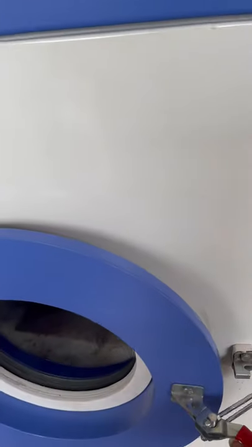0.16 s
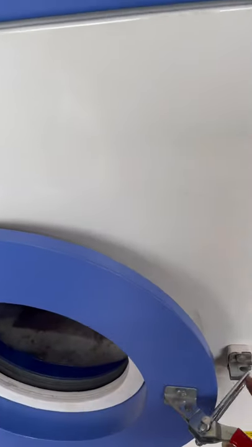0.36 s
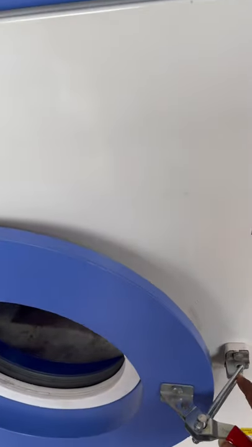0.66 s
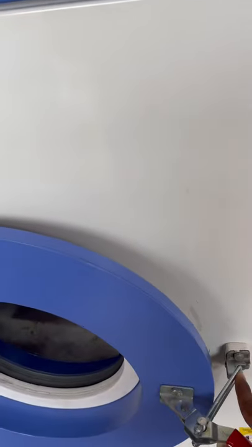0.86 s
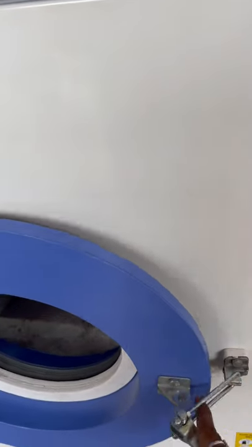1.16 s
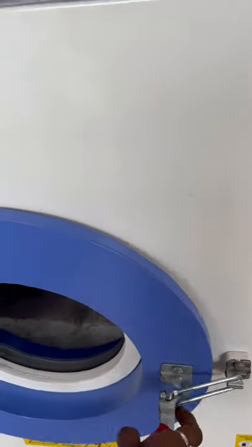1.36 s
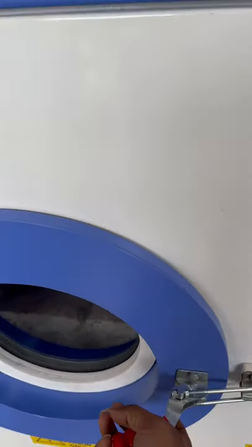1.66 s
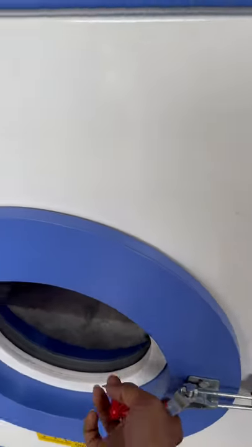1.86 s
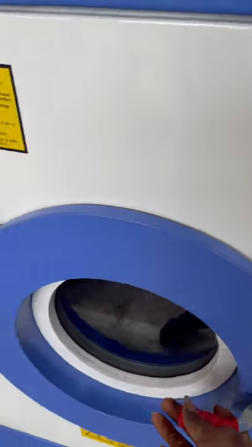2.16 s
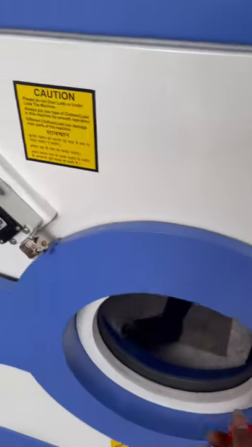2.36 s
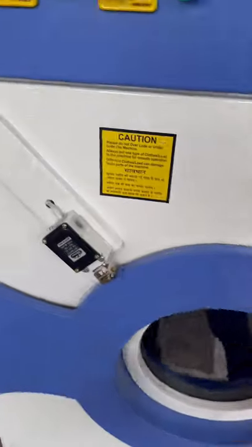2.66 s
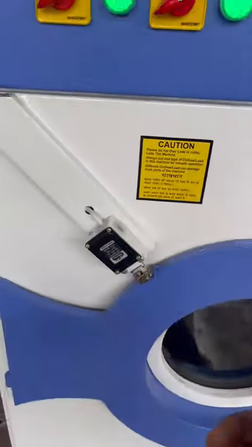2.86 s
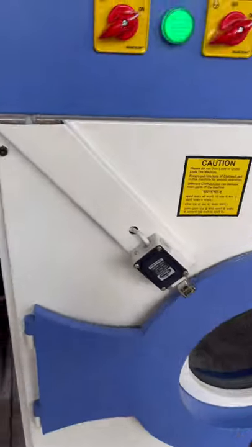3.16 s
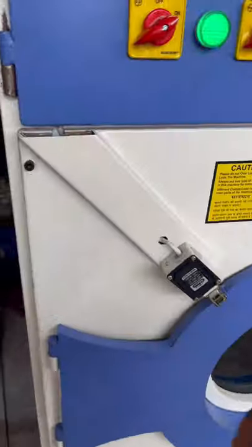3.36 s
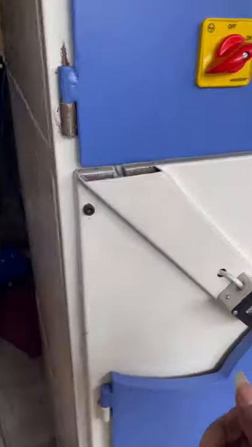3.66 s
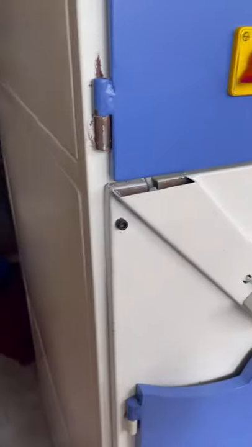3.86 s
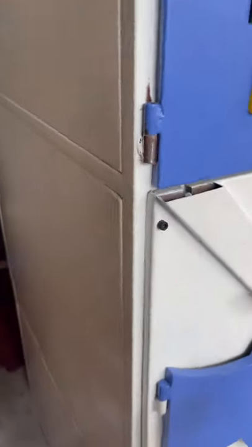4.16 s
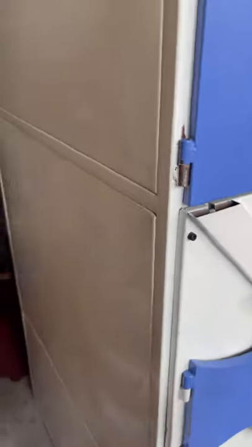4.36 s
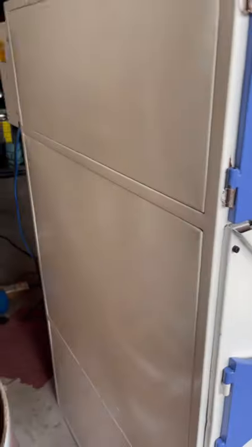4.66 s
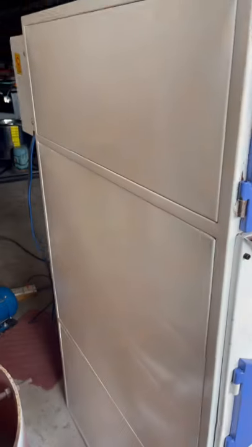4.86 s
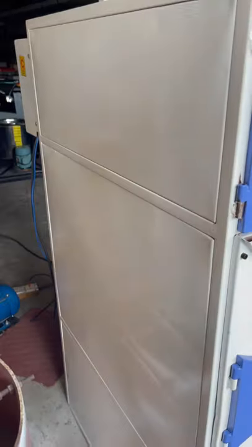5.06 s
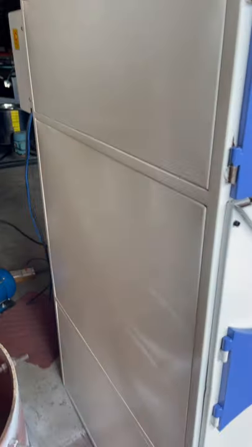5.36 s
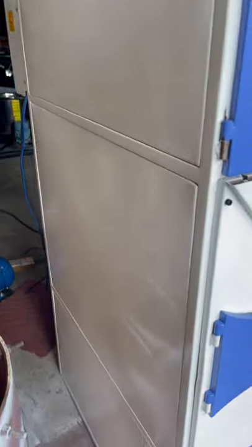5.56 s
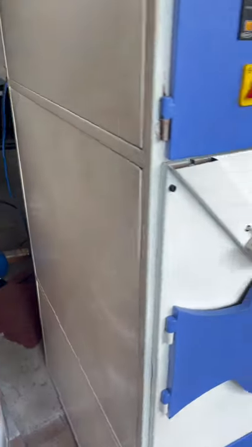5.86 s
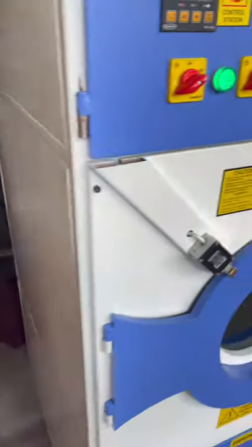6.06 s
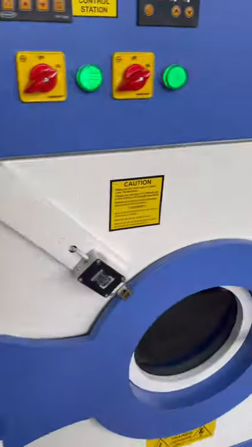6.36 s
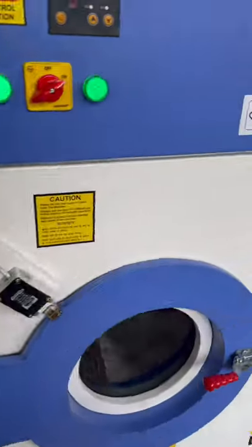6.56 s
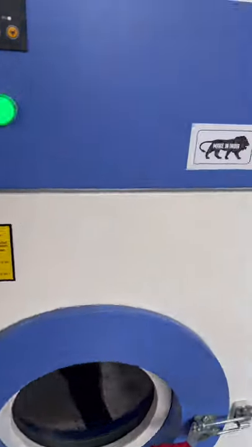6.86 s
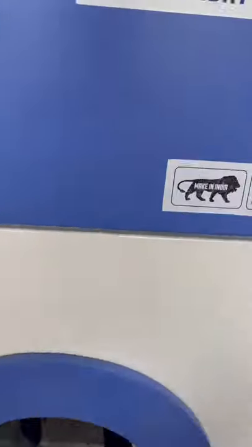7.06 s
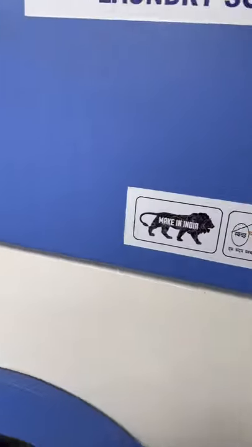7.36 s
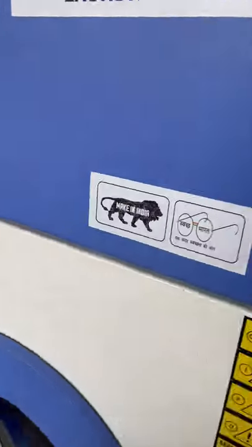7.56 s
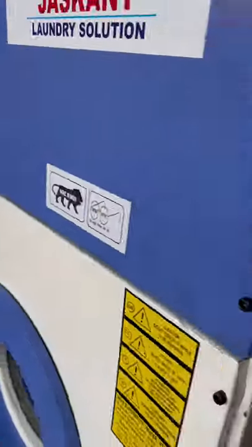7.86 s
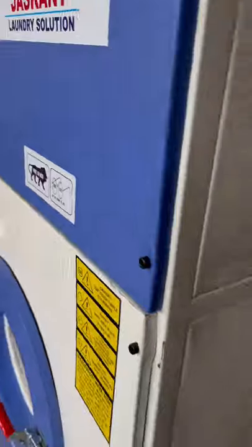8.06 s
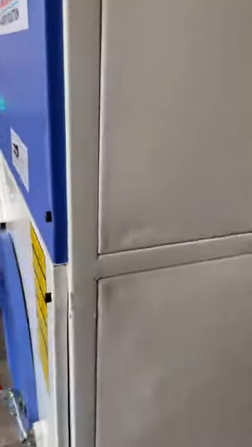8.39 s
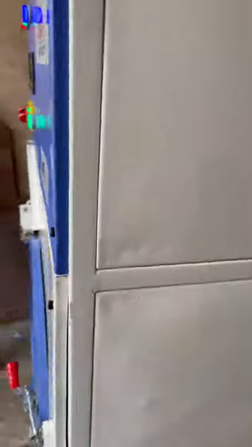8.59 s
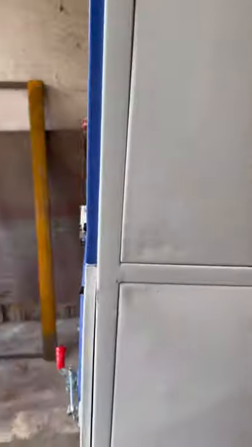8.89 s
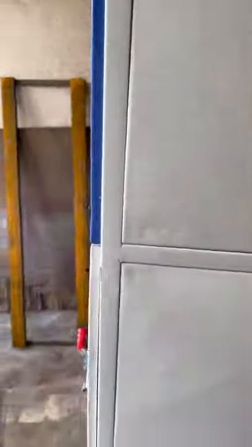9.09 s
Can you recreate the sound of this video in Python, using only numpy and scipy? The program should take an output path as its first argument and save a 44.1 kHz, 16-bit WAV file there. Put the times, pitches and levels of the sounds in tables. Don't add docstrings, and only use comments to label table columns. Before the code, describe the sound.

A large tumble dryer spins up to full speed in a workshop, humming and rumbling with rushing air, after close metallic latch clicks.

```python
import sys
import numpy as np
from scipy import signal
from scipy.fft import rfft, irfft, next_fast_len
from scipy.io import wavfile
from scipy.ndimage import uniform_filter1d, map_coordinates

SR = 44100
rng = np.random.default_rng(int(sys.argv[2]) if len(sys.argv) > 2 else 0)


def gain_from_db(level_db):
    decades = np.asarray(level_db, float) / 20
    return 10 ** decades


def master(y):
    cut = np.clip(np.atleast_2d(y).T, -1, 1)
    pcm = np.round(cut * 32767)
    wavfile.write(sys.argv[1], SR, pcm.astype(np.int16))


N = 407043
TIME_S = np.arange(N) / SR
FULL_TURNS_PER_S = 46.85


def hum():
    # (level [dB], rise [dB/m], echo share [0-1], echo phase [rad])
    tones = [
        (-28.5, -.5, 0.45, 3),
        (-26.5, 10, 0.95, -3),
        (-18.5, 23, 0.5, -2.5),
        (-31, 1.8, 0.23, -1),
        (-32, 0, 0.73, -1.69),
        (-51, -7.5, 0.1, -2.62),
    ]
    # (frequency [Hz], level [dB])
    swept_room = [(306, -0.5), (316, -11), (326, 2.5), (342, 3), (349, -5), (356, -0.5)]
    blades, drive_hz = 8, 233
    shaft_hz, fan = shaft_turns_per_s(), fan_db()
    blade_hz = blades * shaft_hz
    pitches_hz = [blade_hz, shaft_hz, 2 * shaft_hz, 4 * shaft_hz, np.full(N, drive_hz), 2 * blade_hz]
    _, turn_db = walk()
    blade_db = along(swept_room, blade_hz) + 2.93 * turn_db
    extras_db = [fan + blade_db, fan, fan, fan, 0, fan + 13.5 * seam()]
    wavers_db = [1.6, 1.5, 3.7, 3.3, 2.2, 3.8]
    out = np.zeros(N)
    for hz, tone, extra_db, waver_db in zip(pitches_hz, tones, extras_db, wavers_db):
        drift_rad = 0.89 * wobble(5)
        level_db = standing_db(hz, *tone) + extra_db + waver_db * wobble(6)
        phase_rad = 2 * np.pi * np.cumsum(hz) / SR + drift_rad
        out += np.sqrt(2) * gain_from_db(level_db) * np.sin(phase_rad)
    return out


def shaft_turns_per_s():
    shortfall_turns_per_s, run_up_s, run_up_shape = 12.05, .83, 1.18
    return FULL_TURNS_PER_S - shortfall_turns_per_s * np.exp(-(TIME_S / run_up_s) ** run_up_shape)


def fan_db():
    return 1.74 * 20 * np.log10(shaft_turns_per_s() / FULL_TURNS_PER_S)


def airflow():
    # (frequency [Hz], width [Hz], level [dB])
    low_panels = [(62.4, 15, -6), (75, 12, -10), (93, 17, -1.5), (104.5, 13, -4.5), (117, 13, -7),
                  (143.5, 14, -7.5)]
    # (frequency [Hz], width [Hz], level [dB])
    mid_panels = [(171, 12, -4), (191.4, 15, 2.5), (200, 12, 1.5), (216.3, 12, 2), (227.6, 7.6, -0.5),
                  (270, 8.9, -16), (298, 6.6, -5)]
    # (frequency [Hz], width [Hz], level [dB])
    duct = [(328, 27, -6), (361, 15, 1), (403, 14, -2), (455, 17.5, -3.5), (487, 17, -5.5), (518, 12.8, -2),
            (548, 19, -7.5), (578, 30, -10.5), (708, 83, -9), (805, 12, -6), (842, 14.6, -5.5),
            (887, 62, -14), (1028, 96, -14.5), (1164, 53, -11.5), (1343, 97, -18), (1415, 28, -16),
            (1473, 40, -15), (1600, 53, -19.5)]
    rumble = rush(resonant(low_panels, between_db=-9), patchy_db=-0.5, comb_db=1.5, window=4096, tall=2, long=6)
    drone = rush(resonant(mid_panels, between_db=-15), patchy_db=1.5, comb_db=0.5, window=4096, tall=2, long=8)
    air = rush(resonant(duct, between_db=-21), patchy_db=1.5, comb_db=2.5, window=4096, tall=5, long=6)
    hiss = vents()

    lumpy_db, lumps_per_s = 1.74, 7
    gust_db = 0.19 * wobble(6)
    _, turn_db = walk()
    rumble_db = standing_db(99, -29.1, rise_db_per_m=-8, echo=0.29, echo_rad=0.36)
    rumble_db = rumble_db + lumpy_db * wobble(lumps_per_s)
    drone_db = standing_db(205, -23.6, rise_db_per_m=-1.4, echo=0.36, echo_rad=-3)
    drone_db = drone_db + lumpy_db * wobble(lumps_per_s)
    air_db = standing_db(517, -24, rise_db_per_m=3, echo=0.02, echo_rad=-2) + 1.7 * seam() + gust_db
    hiss_db = standing_db(2404, -30.5, rise_db_per_m=3, echo=-0.0543, echo_rad=-0.5)
    hiss_db = hiss_db + 0.21 * turn_db + gust_db
    flow = gain_from_db(rumble_db) * rumble + gain_from_db(drone_db) * drone + gain_from_db(air_db) * air + gain_from_db(hiss_db) * hiss
    return gain_from_db(fan_db()) * flow


def vents():
    # (frequency [Hz], level [dB per Hz])
    hiss = [(1000, -40), (1700, -5), (2400, .5), (3300, -3), (4300, -6), (5100, -9.2), (5800, -9.6),
            (7200, -10.6), (8800, -9.8), (10400, -7), (11200, -12.3), (12000, -20.5), (12800, -27),
            (14000, -40)]
    # (frequency [Hz], depth [dB])
    flutter_shared = [(2000, 1.2), (10000, .8), (12500, 2.5)]
    # (frequency [Hz], depth [dB])
    flutter_apart = [(2000, 1.2), (4500, 2), (6000, 3), (9000, 3), (11500, 2)]
    pair = rush(lambda hz: gain_from_db(along(hiss, hz)), patchy_db=0.4, comb_db=2, window=2048, tall=20, long=8)
    hz, _, spectra = signal.stft(pair, SR, nperseg=512)
    depth_db = np.array([along(flutter_shared, hz), along(flutter_apart, hz)])[..., None]
    fluttering = spectra * gain_from_db(depth_db * patches(spectra.shape, tall=10, long=8))
    return unit(signal.istft(fluttering, nperseg=512)[1][:, :N])


def side_panel():
    # (frequency [Hz], width [Hz], level [dB])
    sheet = [(277.3, 12.6, 0)]
    boom = filtered(rng.standard_normal((2, N)), resonant(sheet, between_db=-60))
    boom_db = standing_db(278, -40, rise_db_per_m=-12.5, echo=0.43, echo_rad=1.7) + 1.5 * wobble(3)
    return gain_from_db(boom_db) * unit(boom)


def latch():
    # (time [s], peak level [dB], centre [Hz], t60 [s], hook ring [dB])
    contacts = [
        (.1426, -22, 1300, .06, -40),
        (.145, -30, 4200, .025, -40),
        (.1975, -22, 9000, .015, -40),
        (.2354, -25, 2800, .045, -40),
        (.3002, -29, 7000, .04, -23),
        (.7008, -25, 3800, .06, -18),
        (.707, -19, 1300, .06, -22),
        (.9448, -27, 5000, .025, -35),
    ]
    # (frequency [Hz], level [dB], t60 [s])
    rod = [(2622, -21, .4), (3677, -19, .35), (5566, -21, .2), (7224, 0, .26), (8393, -14, .3),
           (11470, -20, .1)]
    # (frequency [Hz], level [dB], t60 [s])
    hook = [(5550, 0, .14), (7224, -7, .07), (8950, -4, .08), (9690, -3, .13)]
    out = np.zeros(N + SR)
    t = np.arange(SR // 2) / SR
    out[:len(t)] += gain_from_db(-21) * ring(rod, t)
    for start_s, peak_db, hz, t60_s, ring_db in contacts:
        band_hz = [hz / 1.5, min(hz * 1.5, 12500)]
        band = signal.butter(2, band_hz, "bandpass", fs=SR, output="sos")
        shape = gain_from_db(-60 * t / t60_s - 3) * (1 - np.exp(-t / .0015))
        tick = shape * unit(signal.sosfilt(band, rng.standard_normal(len(t))))
        contact = tick + gain_from_db(ring_db + 12) * ring(hook, t)
        out[round(start_s * SR):][:len(t)] += gain_from_db(peak_db) * contact
    return out[:N]


def ring(modes, t):
    return sum(gain_from_db(db - 60 * t / t60_s) * np.sin(2 * np.pi * hz * t) for hz, db, t60_s in modes)


def rush(gain, patchy_db, comb_db, window, tall, long):
    spectra = signal.stft(rng.standard_normal((2, N)), nperseg=window)[2]
    shape = spectra.shape[1:]
    field_db = patchy_db * patches(shape, tall, long) + comb_db * patches(shape, 1, 4 * long)
    pair = signal.istft(spectra * gain_from_db(field_db), nperseg=window)[1][:, :N]
    return unit(filtered(pair, gain))


def resonant(modes, between_db):
    def gain(f):
        power = sum(gain_from_db(2 * db) / (1 + (2 * (f - hz) / width_hz) ** 2) for hz, width_hz, db in modes)
        inside = (f > modes[0][0]) & (f < modes[-1][0])
        return np.sqrt(power + inside * gain_from_db(2 * between_db))
    return gain


def patches(shape, tall, long):
    smooth_in_hz = uniform_filter1d(rng.standard_normal(shape), tall, -2)
    return unit(uniform_filter1d(smooth_in_hz, long, -1))


def walk():
    # (time [s], place [m], turn [dB])
    path = [(0.0, -0.41, -0.042), (0.3, -0.38, 0.3), (0.8, -0.41, -1.1), (1.4, -0.5, 2.6),
            (2.0, -0.36, -0.7), (2.5, -0.677, -1), (3.2, -0.67, 0.3), (3.7, -0.793, -1.263),
            (4.2, -0.91, -3.265), (4.7, -0.97, 2), (5.3, -0.95, 0.8), (5.9, -0.91, -0.7), (6.3, -0.77, 0.8),
            (6.9, -0.58, 1.4), (7.4, -0.54, -0.1), (7.9, -0.32, -2), (8.5, -0.14, 1.9), (9.23, -0.32, 2)]
    knots_s, place_m, turn_db = np.transpose(path)
    return np.interp(TIME_S, knots_s, place_m), np.interp(TIME_S, knots_s, turn_db)


def standing_db(hz, db, rise_db_per_m, echo, echo_rad):
    place_m, _ = walk()
    path_rad = 2 * 2 * np.pi * place_m * hz / 343
    both = 1 + np.clip(echo, 0, .95) * np.exp(1j * (path_rad + echo_rad))
    return db + rise_db_per_m * place_m + 20 * np.log10(np.abs(both))


def seam():
    seam_s, width_s = 8.6, 0.2
    return np.exp(-((TIME_S - seam_s) / width_s) ** 2)


def diffuse(common, apart):
    # (frequency [Hz], likeness [0-1])
    alike = [(60, .998), (200, .996), (400, .94), (550, .76), (780, .4), (1200, .7), (1800, .92),
             (2200, .7), (2700, .3), (4000, .1), (5000, .68), (5900, .94), (7200, .76), (8500, .9),
             (9100, .99), (11300, .82), (11900, .99)]
    angle_rad = lambda hz: np.arccos(np.clip(along(alike, hz), 0, 1)) / 2
    mid = filtered(common, lambda hz: np.cos(angle_rad(hz)))
    side = filtered(apart, lambda hz: np.sin(angle_rad(hz)))
    return np.array([mid + side, mid - side])


def ports(source, leads):
    # (frequency [Hz], left minus right [dB])
    lean = [(60, -1), (110, -2), (200, -2.0), (360, -5), (650, -3.5), (1180, -1.5), (2150, 0.5), (3900, -2),
            (7080, -1), (12900, 1)]
    lead_hz, lead_rad = np.transpose(leads)

    def response(hz):
        half = gain_from_db(along(lean, hz) / 2) * np.exp(.5j * np.interp(hz, lead_hz, lead_rad))
        return np.array([half, 1 / half])
    return filtered(source, response)


def unit(x):
    return x / np.sqrt(np.mean(x ** 2) + 1e-20)


def along(points, hz):
    f, v = np.transpose(points)
    return np.interp(np.log(hz + 1), np.log(f + 1), v)


def wobble(knots_per_s):
    knots = rng.standard_normal(int(N * knots_per_s / SR) + 4)
    return map_coordinates(knots, [np.arange(N) * knots_per_s / SR])


def filtered(x, response):
    m = next_fast_len(N + SR // 2)
    return irfft(rfft(x, m) * response(np.fft.rfftfreq(m, 1 / SR)), m)[..., :N]


def scene():
    # (frequency [Hz], left leads [rad])
    lead_machine = [(0, 0), (300, -.05), (1200, 0), (2100, .15), (3000, -1.8), (4000, -3.2), (4900, -3.3),
                    (5350, -5), (5900, -6.28), (6300, -6.2), (7000, -5.4), (8500, -3.3), (9700, -3),
                    (11000, -1.6), (11900, 0)]
    # (frequency [Hz], left leads [rad])
    lead_latch = [(0, 0), (6000, 0), (7200, 1.4), (8500, 2.8), (9700, 3.2), (11900, 6.28)]
    common, apart = airflow() + side_panel()
    machine = diffuse(common + hum(), apart)
    return ports(machine, lead_machine) + ports(latch(), lead_latch)


def low_pass(x):
    return signal.sosfilt(signal.butter(12, 13460, fs=SR, output="sos"), x)


def record(dry):
    low_cut = signal.butter(5, 40, "highpass", fs=SR, output="sos")
    heard = signal.sosfilt(low_cut, dry)
    return low_pass(heard)


dry = scene()
out = record(dry)
master(out)
```